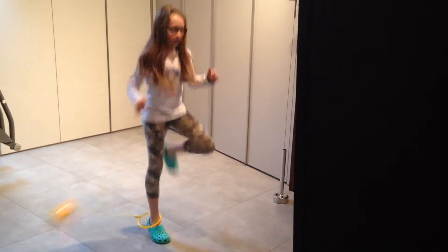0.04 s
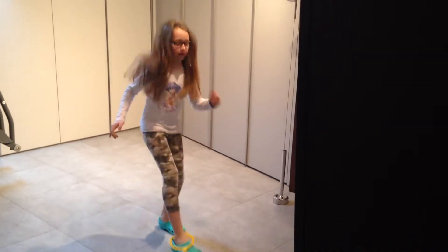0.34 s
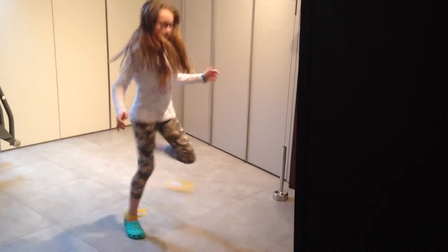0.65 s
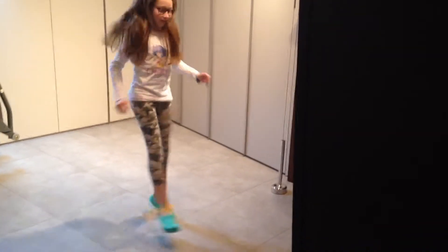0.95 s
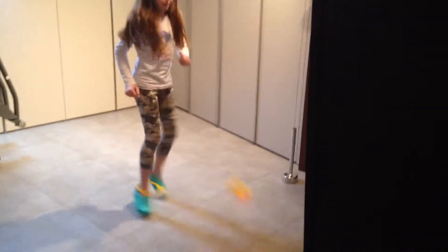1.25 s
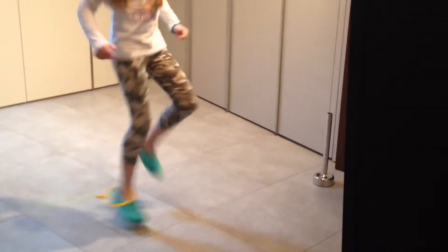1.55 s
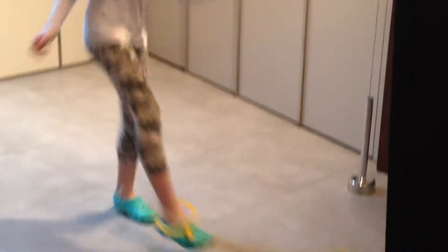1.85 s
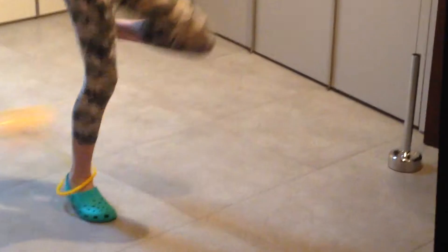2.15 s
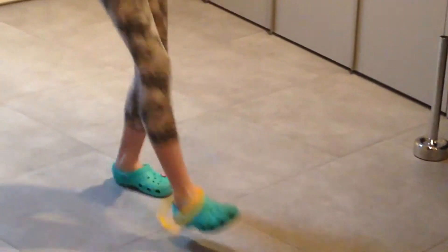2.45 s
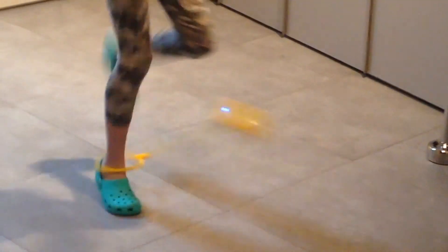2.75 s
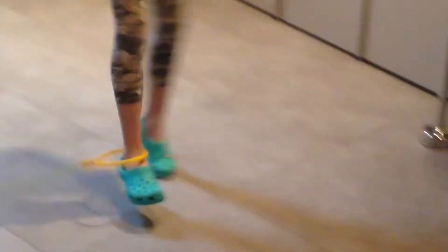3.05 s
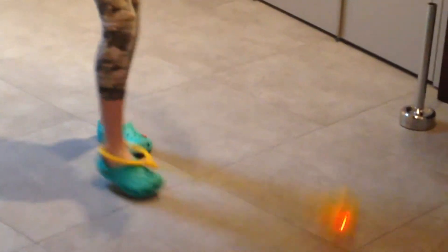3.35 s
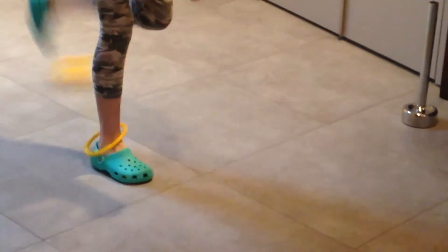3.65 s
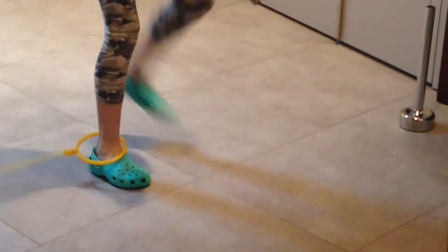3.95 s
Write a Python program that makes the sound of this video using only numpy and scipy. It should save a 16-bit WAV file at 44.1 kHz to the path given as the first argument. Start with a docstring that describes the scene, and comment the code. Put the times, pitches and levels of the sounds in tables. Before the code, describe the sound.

An ankle skipping toy scrapes and clacks over tiles as foam shoes land and scuff.

```python
"""A child skips over an ankle toy in a bare, echoing tiled room, above a faint hum.
From the start the hoop ticks at the ankle, and foam shoes land and scuff on the gritty floor about
three times a second. The hollow plastic weight whirls round on its cord, sliding and clacking over
the tiles so that its shell rings. Just before two seconds it strikes hardest and rattles briefly;
the skipping carries on, and the weight is still sliding at the end."""
import sys
import numpy as np
from scipy import signal
from scipy.fft import rfft, irfft
from scipy.io import wavfile

SR = 44100
rng = np.random.default_rng(int(sys.argv[2]) if len(sys.argv) > 2 else 0)


def unload_wav(signal):
    """Save mono or channel-first audio to the path in sys.argv[1] as 16-bit WAV at rate SR, clipped to [-1, 1]."""
    wavfile.write(
        sys.argv[1],
        SR,
        np.round(np.clip(np.atleast_2d(signal).T, -1, 1) * 32767).astype(np.int16),
    )


N = 176400
T = np.arange(N) / SR


def weight_clacks(decay_s=0.0018):
    """The weight knocks on the tiles: each hard snap has its own bright pitch and rings the shell."""
    # start_s, level_db, pitch_hz
    knocks = [(0.297, -37, 4200), (0.501, -27.5, 5940), (.523, -26, 5700), (0.967, -30.5, 6200),
              (1.262, -25, 5130), (1.524, -32.5, 5270), (1.644, -28, 5300), (1.9444, -16, 4000),
              (1.951, -33, 4460), (1.9653, -34, 4000), (1.98, -25.5, 4150), (2.021, -41, 4200),
              (2.583, -29.5, 3660), (2.702, -25, 4450), (2.728, -40, 5000), (3.047, -36, 4600),
              (3.455, -29.5, 2410)]
    contacts = sum(resonant(snap(start_s, level_db, decay_s), pitch_hz, width=0.65)
                   for start_s, level_db, pitch_hz in knocks)
    return shell_ring(contacts)


def weight_slides():
    """Each pass over the tiles swells and fades: a rub, a gritty hiss and a rasp that rings the shell."""
    # peak_s, rise_s, fall_s, rub_db, hiss_db, rasp_db, rasp_pitch_hz
    passes = [(.27, 0.036, 0.057, -47, -48, -66, 4000), (.305, 0.015, 0.042, -44, -55, -49, 4000),
              (.70, 0.085, 0.14, -56, -55, -56, 5400), (.89, 0.047, 0.063, -45.5, -44.5, -61, 4200),
              (.975, .04, 0.11, -51, -45.5, -52.5, 6000), (1.28, 0.023, 0.043, -44, -61, -48.5, 3360),
              (1.535, 0.053, .035, -49.5, -42, -49, 5060), (1.68, 0.092, 0.08, -47, -50, -49.5, 3270),
              (2.275, 0.044, 0.061, -42, -44.5, -68, 5000), (2.35, .07, 0.059, -41, -40, -57, 5500),
              (2.41, 0.035, 0.042, -52, -50, -45, 3350), (1.98, .025, 0.024, -43, -56, -39, 4060),
              (2.748, 0.054, 0.029, -60, -45.5, -34, 4700), (3.06, .08, 0.083, -46.5, -46.5, -51.5, 5040),
              (3.17, .02, 0.037, -51.5, -45.5, -61, 4500), (3.365, .02, 0.057, -46.5, -43, -58, 4180),
              (3.475, 0.022, 0.048, -46, -54, -47.5, 2130), (3.68, .07, 0.07, -48.5, -43.5, -53.5, 2210),
              (3.81, 0.08, .08, -44, -44.5, -64, 5000), (3.95, 0.081, 0.068, -49, -47.5, -45.5, 3850)]
    # body of the rub: frequency_hz, gain_db
    rub_eq = [(150, -18), (280, -9.5), (650, -15.5), (1100, -6.5), (2200, 3), (2750, -4.5), (3400, 1),
              (6500, -3.5), (9000, -9), (15500, -18)]
    # sizzle of the grit: frequency_hz, gain_db
    hiss_eq = [(1000, -23), (3500, 1), (6000, 2.5), (8000, 1), (13000, 0.5), (15500, -1.5)]
    rub_power, hiss_power, rasp = 0, 0, 0
    friction = grit()
    for peak_s, rise_s, fall_s, rub_db, hiss_db, rasp_db, pitch_hz in passes:
        from_peak = (T - peak_s) / np.where(T < peak_s, rise_s, fall_s)
        pressure = np.exp(-np.minimum(from_peak ** 2, 20))
        rub_power += (from_db(rub_db) * pressure) ** 2
        hiss_power += (from_db(hiss_db) * pressure) ** 2
        rasp += resonant(from_db(rasp_db) * pressure * friction, pitch_hz, width=0.21)
    rub = equalise(np.sqrt(rub_power) * grit(), rub_eq)
    hiss = equalise(np.sqrt(hiss_power) * grit(), hiss_eq)
    return rub + hiss + shell_ring(rasp)


def shell_ring(contact):
    """A contact sound plus the ringing it excites in the hollow plastic shell."""
    # pitch_hz, level_db, t60_s
    modes = [(2144, -11, 0.082), (3990, -27, .25), (4210, -19, 0.11), (4430, -19.5, .2), (4520, -26.5, .25),
             (5000, -28, .15), (5500, -26, .2), (6120, -11, 0.11), (6705, -14, 0.087), (8280, -14.5, 0.11)]
    age = T[:SR // 3]
    ring = sum(from_db(level_db - 60 * age / t60_s) * np.sin(2 * np.pi * hz * age) / np.sqrt(t60_s * SR)
               for hz, level_db, t60_s in modes)
    return contact + 2 * signal.fftconvolve(contact, ring)[:N]


def hoop_ticks(decay_s=0.0033):
    """The hoop taps at the ankle in thin, dry ticks."""
    # start_s, level_db
    taps = [(0.04, -43), (.052, -35.5), (.26, -36.5), (.503, -31), (.664, -41), (.752, -36.5), (1.05, -44),
            (1.461, -36), (1.478, -35.5), (1.95, -29.5), (2.271, -30), (2.829, -33), (2.846, -36),
            (2.89, -37), (3.165, -37), (3.331, -30.5), (3.572, -35), (3.613, -35.5)]
    # nearly all treble: frequency_hz, gain_db
    tick_eq = [(1000, -28), (4000, -7), (7000, -3), (10000, 3), (15500, 0)]
    ticks = sum(snap(start_s, level_db, decay_s) for start_s, level_db in taps)
    return equalise(ticks, tick_eq)


def shoe_landings(attack_s=0.0032, thud_decay_s=0.032, slap_decay_s=0.016):
    """A foam shoe lands with a soft heel thud and a gritty slap of the sole."""
    # start_s, thud_db, slap_db
    steps = [(0.064, -52, -47.5), (.195, -48, -47), (.45, -45.5, -56), (.526, -43.5, -34.5),
             (.67, -56, -51), (.91, -62, -60), (1.156, -51, -47.5), (1.253, -48, -41),
             (1.284, -53.5, -39.5), (1.605, -50.5, -47), (1.87, -49.5, -47.5), (1.945, -48, -50),
             (1.978, -45.5, -45), (2.189, -50.5, -45.5), (2.58, -46.5, -53), (2.597, -56, -62),
             (2.657, -50, -45), (2.696, -53, -43), (2.905, -57, -54), (2.958, -52, -45.5),
             (3.265, -47.5, -43), (3.352, -45, -49), (3.386, -56, -50), (3.453, -45.5, -36),
             (3.68, -50.5, -44)]
    # low weight of the heel: frequency_hz, gain_db
    thud_eq = [(30, -24), (60, -0.5), (110, -3), (150, -5.5), (200, -1), (255, 5), (370, -1), (520, -6),
               (900, -12), (3000, -27)]
    # midrange smack of the sole: frequency_hz, gain_db
    slap_eq = [(100, -11), (400, -3), (700, -1.5), (1100, 2), (2100, 2.5), (2800, -13), (4000, -4.5),
               (8000, -17), (15000, -22)]
    heel = hit_envelope([(start_s, db, thud_decay_s) for start_s, db, _ in steps], attack_s)
    sole = hit_envelope([(start_s, db, slap_decay_s) for start_s, _, db in steps], attack_s)
    return equalise(heel * rng.standard_normal(N), thud_eq) + equalise(sole * grit(), slap_eq)


def shoe_scuffs():
    """The soles drag grit across the floor in short, bright scrapes."""
    # start_s, level_db, decay_s
    scuffs = [(.04, -45, 0.056), (.195, -46, 0.044), (.436, -41, 0.036), (.503, -39, 0.039),
              (.665, -50, .04), (.84, -42.5, 0.023), (1.222, -44.5, 0.035), (1.25, -35.5, .02),
              (1.262, -38.5, 0.036), (1.478, -40.5, 0.032), (1.632, -36.5, 0.026), (1.919, -37, .012),
              (1.938, -39, 0.03), (2.19, -41, 0.044), (2.579, -30.5, 0.0058), (2.596, -39.5, 0.029),
              (2.668, -35.5, 0.026), (2.845, -47, .025), (2.96, -38.5, 0.027), (3.27, -46.5, 0.033),
              (3.315, -39, 0.011), (3.333, -42, 0.033), (3.453, -33.5, 0.024)]
    # sandy edge of the scrape: frequency_hz, gain_db
    scuff_eq = [(300, -17), (1000, -9.5), (2000, 3.5), (2800, 0.5), (4000, -0.5), (6000, 3.5), (7800, -1.5),
                (12500, -2), (15500, -10.5)]
    return equalise(hit_envelope(scuffs, attack_s=0.0021) * grit(), scuff_eq)


def room_echoes(send, bands=12, first_echo_s=0.0052):
    """Dense echoes off tiles and cupboard doors; the treble dies first."""
    # frequency_hz, t60_s
    decay_times = [(100, 0.56), (300, 0.64), (1000, 0.78), (2200, 0.76), (4000, 0.65), (8000, 0.43),
                   (15000, 0.38)]
    age, hz = T[:SR], np.fft.rfftfreq(SR, 1 / SR)
    white = rfft(rng.standard_normal(SR))
    centres_hz = np.geomspace(100, 16000, bands)
    tail = 0
    for centre_hz, band_gains in zip(centres_hz, np.eye(bands)):
        band = irfft(white * at_hz(list(zip(centres_hz, band_gains)), hz))
        tail += band * from_db(-60 * age / at_hz(decay_times, centre_hz))
    return through(send, tail * (age > first_echo_s))


def room_tone(air_db=-54, hum_hz=99.2, hum_db=-68.5):
    """A steady bed of room air and faint mains hum."""
    # colour of the air: frequency_hz, gain_db
    air_eq = [(25, -12), (50, -7), (85, 3), (150, -8), (260, -3), (600, -10.5), (1200, -8), (2100, -1),
              (2900, -10.5), (5000, -8.5), (9000, -21.5), (15500, -29)]
    air = from_db(air_db) * equalise(rng.standard_normal(N), air_eq)
    hum = from_db(hum_db) * np.sqrt(2) * np.sin(2 * np.pi * hum_hz * T)
    return air + hum


def grit(grains_per_s=2500, spread_db=3.5, hiss_db=-3):
    """Friction: tiny clicks of uneven size on a smooth hiss; rms 1."""
    sizes = from_db(spread_db * np.minimum(rng.exponential(1, N), 4))
    grains = sizes * rng.choice([-1, 1], N) * (rng.random(N) < grains_per_s / SR)
    texture = grains / grains.std() + from_db(hiss_db) * rng.standard_normal(N)
    return texture / texture.std()


def snap(start_s, level_db, decay_s):
    """A hard contact: a noise burst with an instant attack."""
    return hit_envelope([(start_s, level_db, decay_s)], attack_s=1 / SR) * rng.choice([-1, 1], N)


def hit_envelope(hits, attack_s):
    """Hits rise quickly and fall exponentially; where they overlap, their power adds."""
    power = np.zeros(N)
    for start_s, level_db, decay_s in hits:
        start = max(int(start_s * SR), 0)
        age = T[:min(N - start, SR // 2)]
        envelope = from_db(level_db) * np.minimum(age / attack_s, 1) * np.exp(-age / decay_s)
        power[start:start + len(age)] += envelope ** 2
    return np.sqrt(power)


def resonant(x, hz, width, size=512):
    """A broad resonance; the width is a share of its pitch."""
    radius = np.exp(-np.pi * width * hz / SR)
    feedback = [1, -2 * radius * np.cos(2 * np.pi * hz / SR), radius ** 2]
    return through(x, signal.lfilter([1, 0, -1], feedback, signal.unit_impulse(size)))


def equalise(x, curve, size=4096):
    """Minimum-phase EQ in the shape of the curve, so nothing rings ahead of an attack."""
    gains = from_db(at_hz(curve, np.fft.rfftfreq(size, 1 / SR)))
    cepstrum = irfft(np.log(gains))
    cepstrum[1:size // 2] *= 2
    cepstrum[size // 2 + 1:] = 0
    return through(x, irfft(np.exp(rfft(cepstrum))))


def through(x, response):
    """Pass a sound through an impulse response scaled to unit energy."""
    return signal.fftconvolve(x, response / np.linalg.norm(response))[:len(x)]


def at_hz(curve, hz):
    """Read a curve on a log-frequency axis."""
    points_hz, values = np.transpose(curve)
    return np.interp(np.log(np.maximum(hz, 1)), np.log(points_hz), values)


def from_db(db):
    """Decibels to gain."""
    return 10 ** (np.asarray(db) / 20)


def scene():
    """Shoes and toy in the room, in mono; the clicks get the stronger reverb send."""
    shuffle = shoe_landings() + shoe_scuffs() + weight_slides()
    clicks = weight_clacks() + hoop_ticks()
    echoes = room_echoes(from_db(-3) * shuffle + from_db(-0.5) * clicks)
    return (from_db(-0.5) * shuffle + clicks + echoes + room_tone())[None]


def record(dry):
    """A steep low-pass takes off the very top."""
    cutoff_hz = 15500
    return signal.sosfilt(signal.ellip(10, 0.2, 75, cutoff_hz, fs=SR, output="sos"), dry)


dry = scene()
out = record(dry)
unload_wav(out)
```